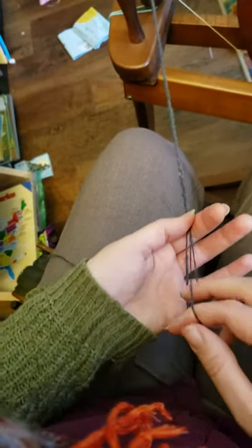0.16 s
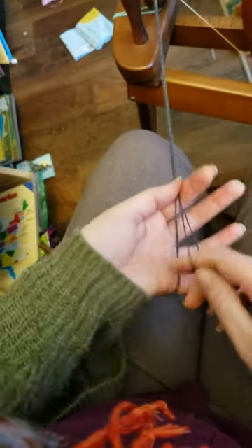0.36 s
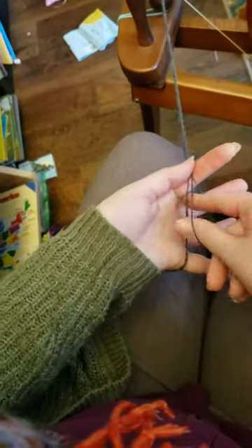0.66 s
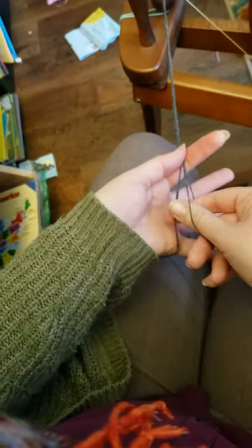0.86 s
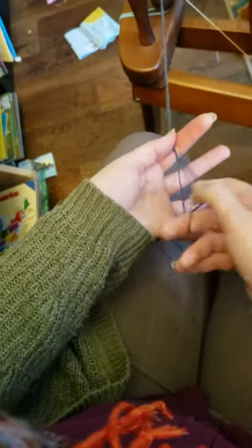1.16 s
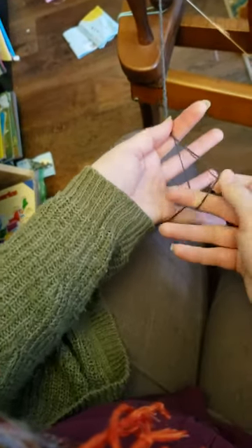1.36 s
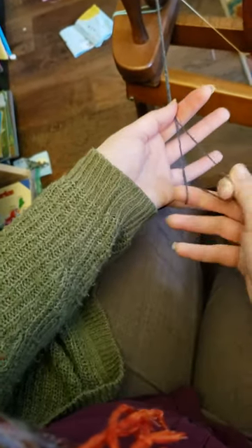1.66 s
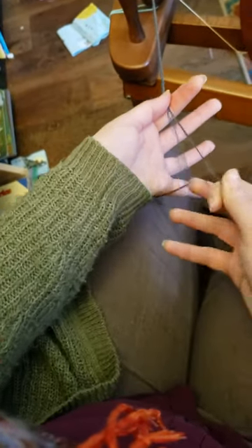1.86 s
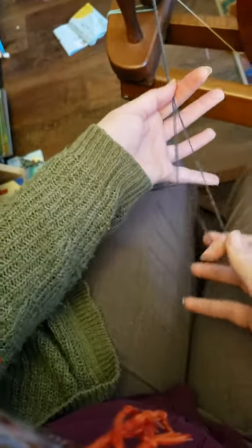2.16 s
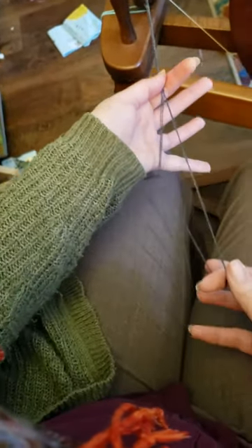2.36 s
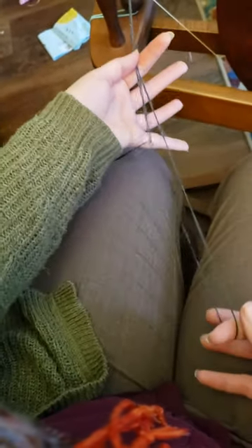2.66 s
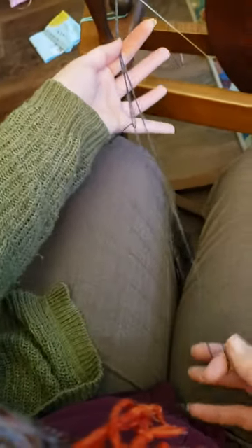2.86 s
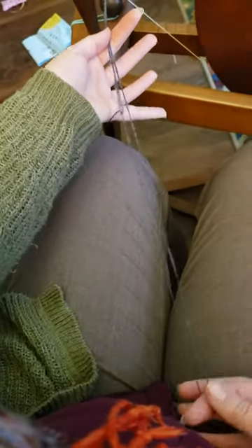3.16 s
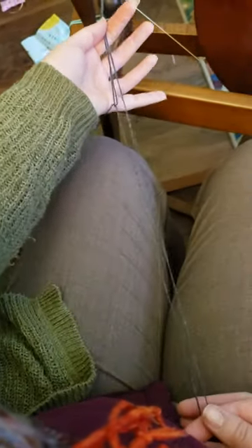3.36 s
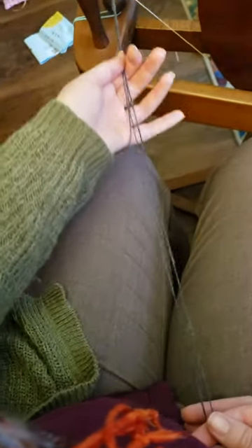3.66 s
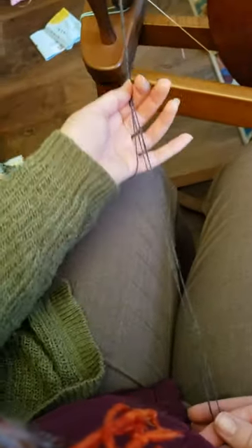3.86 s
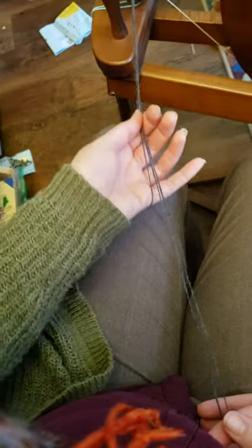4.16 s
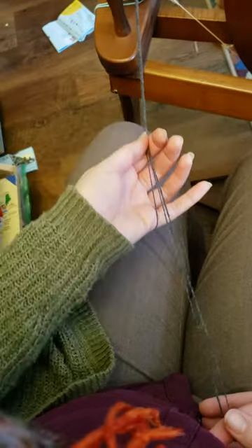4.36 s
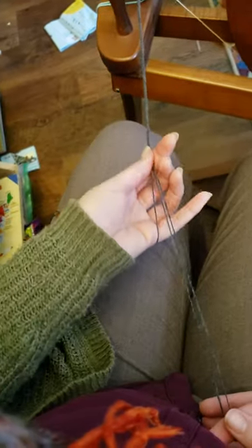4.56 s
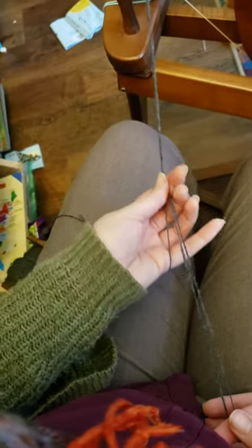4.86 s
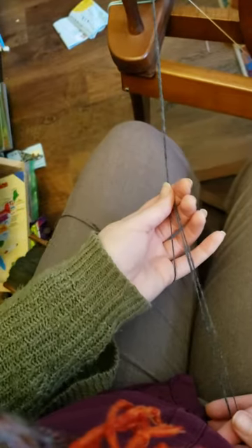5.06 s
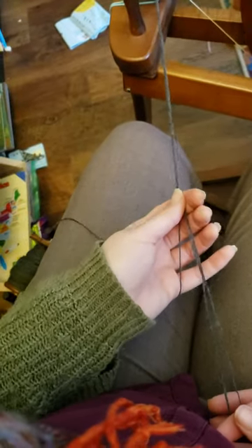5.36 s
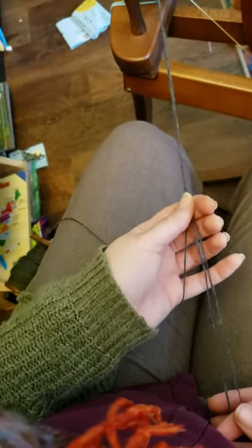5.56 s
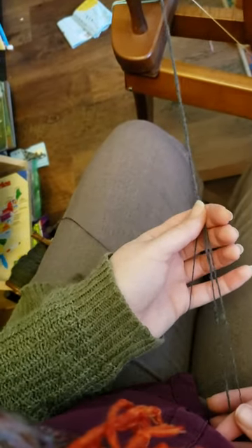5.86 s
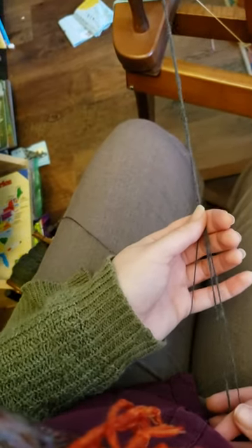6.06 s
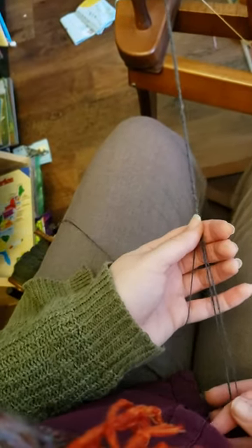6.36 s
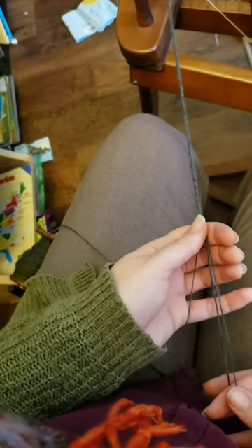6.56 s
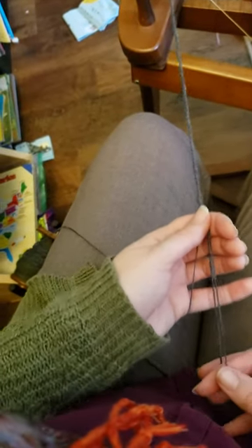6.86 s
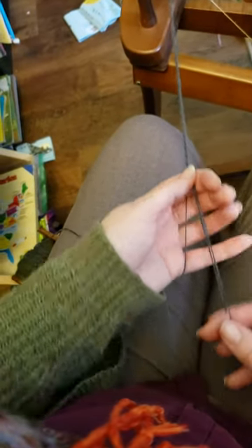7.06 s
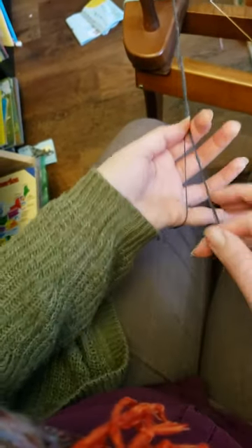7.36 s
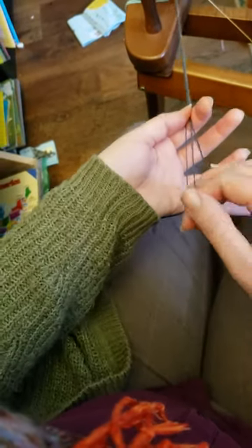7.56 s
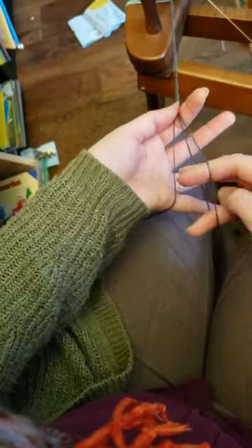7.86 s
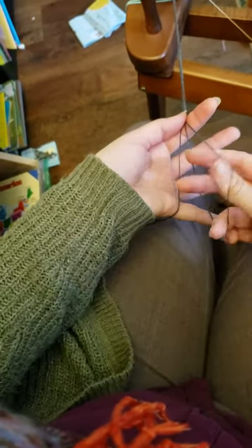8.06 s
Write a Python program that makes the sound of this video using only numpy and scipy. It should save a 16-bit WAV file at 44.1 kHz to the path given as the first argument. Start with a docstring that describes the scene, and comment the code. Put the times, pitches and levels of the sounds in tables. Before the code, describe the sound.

A wooden spinning wheel is treadled indoors, knocking softly about every second and a half, with faint clicks over a low hum.

```python
"""Treadled spinning wheel

A wooden wheel turns in a small room. Once a turn the treadle link takes up its slack with a soft knock;
about half a turn later it falls back, mostly with a double bump. Both ring the frame's modes.
The flyer hums and rumbles through the frame, the drive band rubs, yarn slides, the dry spindle squeaks
and the bobbin clicks, over low room noise and a faint hiss."""
import sys
import numpy as np
from scipy.fft import rfft, irfft, next_fast_len
from scipy.io import wavfile
from scipy.ndimage import map_coordinates

SR = 44100
rng = np.random.default_rng(int(sys.argv[2]) if len(sys.argv) > 2 else 0)


def int16_out(signal):
    """Quantize to a 16-bit WAV file."""
    q = np.round(np.clip(np.atleast_2d(signal).T, -1, 1) * 32767)
    wavfile.write(sys.argv[1], SR, q.astype(np.int16))


N = 362708
TIME_S = np.arange(N) / SR
BLOW_TIME_S = np.arange(SR // 2) / SR


def amp(db):
    """Decibels to gain."""
    return 10 ** (np.asarray(db) / 20)


def pan(left_db, right_db):
    """A gain for each channel."""
    return amp([[left_db], [right_db]])


def unit(x):
    """Scale to rms 1."""
    return x / np.sqrt(np.mean(x ** 2) + 1e-30)


def along(points, hz):
    """Interpolate (Hz, value) points on a log axis."""
    point_hz, values = np.transpose(points)
    return np.interp(np.log(hz + 1), np.log(point_hz), values)


def curves(rows):
    """One value per sample for each column after the time."""
    times_s, *columns = np.transpose(rows)
    return [np.interp(TIME_S, times_s, column) for column in columns]


def wobble(knots_per_s):
    """A smooth random curve, rms near 1."""
    knots = rng.standard_normal(int(N * knots_per_s / SR) + 4)
    return map_coordinates(knots, [TIME_S * knots_per_s])


# Each row: frequency in Hz, left-right correlation.
CORRELATION = [(30, 1), (100, 0.94), (280, 0.95), (500, 1), (900, 0.38), (2000, 0.023)]

def noise(spectrum, size=N, tilt_db_per_oct=0):
    """Stereo noise of rms 1, alike in the bass and unrelated in the treble."""
    n_fft = next_fast_len(size)
    hz = np.fft.rfftfreq(n_fft, 1 / SR)
    spread = np.arccos(np.clip(along(CORRELATION, hz), -1, 1)) / 2
    colour = amp(along(spectrum, hz) + tilt_db_per_oct * np.log2(np.maximum(hz, 400) / 1000))
    white = rfft(rng.standard_normal((2, n_fft)))
    mid, side = irfft(white * colour * [np.cos(spread), np.sin(spread)], n_fft)[:, :size]
    return unit(np.array([mid + side, mid - side]))


def resonance(hz, half_width_hz):
    """Narrow stereo noise of rms 1, whose centre may glide."""
    shape = 1 / (1 + (np.fft.fftfreq(N, 1 / SR) / half_width_hz) ** 2)
    white = rng.standard_normal((2, N)) + 1j * rng.standard_normal((2, N))
    baseband = np.fft.ifft(np.fft.fft(white) * shape)
    carrier = np.exp(2j * np.pi * np.cumsum(hz * np.ones(N)) / SR)
    return unit((baseband * carrier).real)


def swell(rise_s, t60_s):
    """Half a second of envelope: a smooth rise to 1, then exponential decay."""
    attack = np.sin(np.pi / 2 * np.minimum(BLOW_TIME_S / max(rise_s, 1 / SR), 1))
    return attack * amp(-60 * np.maximum(BLOW_TIME_S - rise_s, 0) / t60_s)


def burst(spectrum, rise_s, t60_s, room_db, room_t60_s, tilt_db_per_oct=0):
    """A short noisy blow and the room's weaker, later tail."""
    direct = noise(spectrum, SR // 2, tilt_db_per_oct) * swell(rise_s, t60_s)
    tail = noise(spectrum, SR // 2, tilt_db_per_oct) * swell(rise_s + 0.022, room_t60_s)
    return direct + amp(room_db) * tail


def add(track, start_s, sound):
    """Mix a sound in at a time."""
    start = max(round(start_s * SR), 0)
    part = track[:, start:start + sound.shape[-1]]
    part += sound[..., :part.shape[-1]]


def strokes(rows):
    """A gain that swells and fades once for each row."""
    gain = np.zeros((1, N))
    for start_s, length_s, db in rows:
        add(gain, start_s, amp(db) * np.sin(np.linspace(0, np.pi, round(length_s * SR))))
    return gain


# Each row: frequency in Hz, relative level in dB.
ROOM_SPECTRUM = [(20, -26.5), (32, -22.5), (48, -3), (62, -1), (100, -7.5), (160, -17.5), (300, -36),
                 (600, -40), (1200, -44), (4500, -49.5), (7000, -67)]
HISS_SPECTRUM = [(1000, -2.5), (5000, -10), (6800, -32), (9000, -9), (10700, -1.5), (15500, -3)]
# Each row: frequency in Hz, level in dB.
ROOM_TONES = [(494, -84.5), (597, -88)]

def background():
    """Low room noise, two faint steady tones and the microphone's own hiss."""
    tones = sum(amp(db) * np.sin(2 * np.pi * hz * TIME_S + 0.39 * wobble(4.7)) for hz, db in ROOM_TONES)
    return amp(-58) * noise(ROOM_SPECTRUM) + tones + amp(-79.5) * noise(HISS_SPECTRUM)


# Each row: centre in Hz, width in Hz, relative level in dB.
WHISTLE_BANDS = [(6380, 560, -15), (7037, 150, 0), (7355, 125, 3), (7495, 840, -5.5), (10670, 580, -4.5),
                 (11300, 250, -13.5), (14200, 1100, -17.5)]
# Each row: time in seconds, level in dB.
WHISTLE_LEVEL = [(0, -68), (3.7, -67.5), (4.3, -66.5), (6.9, -66), (7.6, -69)]

def whistle(pulse):
    """Thin bands of hiss on the left: all flutter, and the highest swell most with each pulse."""
    hz = np.fft.rfftfreq(N, 1 / SR)
    level_db, = curves(WHISTLE_LEVEL)
    top_hz = WHISTLE_BANDS[-1][0]
    out = 0
    for centre_hz, width_hz, db in WHISTLE_BANDS:
        shape = amp(db) / (1 + ((hz - centre_hz) / (0.55 * width_hz)) ** 2)
        depth_db = 5 * (centre_hz / top_hz) ** 3
        out += irfft(rfft(rng.standard_normal(N)) * shape, N) * amp(depth_db * pulse)
    return amp(level_db + 0.9 * wobble(36)) * unit(out) * pan(0, -33)


def wheel_turns():
    """Turns at each sample: one from knock to knock, the pace continued at both ends."""
    knocks_s = [knock[0] for knock in KNOCKS]
    marks_s = [2 * knocks_s[0] - knocks_s[1], *knocks_s, 2 * knocks_s[-1] - knocks_s[-2]]
    return np.interp(TIME_S, marks_s, np.arange(len(marks_s)))


# Each row: time in seconds, level in dB.
HUM_LEVEL = [(0, -58), (1.7, -63.5), (2.9, -59.5), (3.9, -54), (4.4, -63.5), (5.3, -57), (5.9, -56.5),
             (7.1, -54), (8.2, -51.5)]
# Each row: time in seconds, pitch in Hz.
HUM_PITCH = [(0, 71.4), (2.7, 73.47), (4, 70.88), (6.3, 72.5), (8.2, 69.9)]
# The frame judders, mostly as yarn is drawn. Each row: start in seconds, length in seconds, level in dB.
JUDDERS = [(.12, 0.41, -55.5), (1.06, 0.11, -51), (1.28, 0.3, -56), (2.57, 0.2, -44.5), (2.74, 0.38, -44.5),
           (3.19, 0.3, -57.5), (3.48, 0.13, -54)]
# Each row: frequency in Hz, relative level in dB.
RUMBLE_SPECTRUM = [(90, -6.5), (160, -9), (240, 4.5), (330, -5.5), (400, -10.5), (500, -11.5), (700, -27.5),
                   (1200, -39), (2500, -68)]

def flyer():
    """The flyer hums, swelling with each push of the foot; the shaking frame adds octave and rumble."""
    push_db, push_lag_turns, tremble_db = 2.5, 0.33, -63.5
    hum_db, = curves(HUM_LEVEL)
    hum_db += push_db * np.cos(2 * np.pi * (wheel_turns() - push_lag_turns))
    shudders = strokes([(start_s, length_s, db) for start_s, *_, db, length_s in KNOCKS])
    shake = amp(tremble_db) + shudders + strokes(JUDDERS)
    hz, = curves(HUM_PITCH)
    phase = 2 * np.pi * np.cumsum(hz) / SR
    hum = unit(np.sin(phase + 0.5 * wobble(16)) * amp(1.86 * wobble(22)))
    octave = unit(np.sin(2 * phase + 1.47 * wobble(28)) * amp(3.2 * wobble(35)))
    rumble = noise(RUMBLE_SPECTRUM) * amp(1.88 * wobble(25))
    return amp(hum_db) * hum + shake * (amp(-4) * octave + amp(-11.5) * rumble)


# Each row: time in seconds, rush in dB, resonance in dB, its centre in Hz.
YARN_DRAW = [(0, -68, -74.5, 1775), (.6, -67.5, -78.5, 1933), (1.0, -66, -81, 2022),
             (1.45, -72.5, -83.5, 2226), (2.05, -66.5, -82, 2020), (2.8, -68.5, -100, 1766),
             (3.15, -80, -105, 1790), (8.2, -115, -120, 1740)]
# Each row: frequency in Hz, relative level in dB.
YARN_SPECTRUM = [(300, 7.5), (600, -6.5), (800, -4), (1080, -3.5), (1450, -12.5), (2100, -11), (2800, -44),
                 (5000, -35)]

def yarn():
    """Yarn slides as the hand draws back: a soft rush with one gliding resonance."""
    rush_db, glide_db, hz = curves(YARN_DRAW)
    rush = amp(rush_db) * noise(YARN_SPECTRUM)
    return rush + amp(glide_db) * resonance(hz, half_width_hz=165) * pan(1, -1)


# Each row: start in seconds, length in seconds, level in dB.
SQUEAKS = [(1.2, 0.11, -83), (1.38, 0.18, -82), (4.03, 0.17, -77), (4.25, .12, -78.5), (4.38, 0.16, -78),
           (4.54, 0.12, -80.5), (5.34, 0.13, -79), (6.76, 0.21, -82), (7.78, 0.51, -92.5)]
# Each row: frequency in Hz, relative level in dB.
SQUEAK_SPECTRUM = [(2000, -15), (2500, -21), (2800, -3.5), (3100, -11), (3420, 2.5), (3650, -7),
                   (5000, -14)]
WHISPER_SPECTRUM = [(1200, -43), (1550, -10.5), (1850, -17), (2200, -3), (2400, -5), (2570, -0.5),
                    (2820, 0), (3130, -12), (3460, -1), (3900, -7.5), (4400, -6.5), (5500, -10.5)]

def spindle(pulse):
    """The dry spindle whispers in its bearing, rubs with each pulse and at times squeaks hoarsely."""
    friction = strokes(SQUEAKS) + amp(-84.5) * np.maximum(pulse, 0)
    squeak = resonance(hz=2568, half_width_hz=32) + amp(-0.5) * noise(SQUEAK_SPECTRUM)
    whisper = noise(WHISPER_SPECTRUM) * amp(-79 + 1.66 * wobble(18))
    return friction * squeak * pan(2, -9) + whisper * pan(2.5, -4)


# Each row: frequency in Hz, level in dB, natural rise in seconds, t60 in seconds.
FRAME_MODES = [(60.7, -11.5, 0.017, 0.18), (133.2, -3, 0.026, 0.085), (195.4, -11.5, 0.0039, 0.17),
               (237.7, -17, 0.028, 0.26), (293.05, -11, 0.0094, 0.043), (345.9, -13.5, 0.033, 0.11),
               (354.9, -18, 0.02, 0.31), (468, -22.5, 0.012, 0.064), (490.3, -24, 0.0082, 0.18),
               (648, -38, 0.031, 0.23), (717, -33, 0.02, 0.18), (877, -35, 0.0063, 0.26),
               (1130, -39, .006, 0.14), (1167, -33.5, 0.012, 0.21), (1253, -34, .004, 0.18),
               (1390, -34, 0.0015, 0.15), (1530, -25.5, 0.001, 0.13)]
BASS_HZ = 260  # modes below this carry the treadle's weight

def frame(drive_db, scatter_db, rise_s=None):
    """One blow rings the frame's modes, each weighted by drive_db(hz); the low ones set in last."""
    lag_cycles = 0.42
    out = np.zeros((1, SR // 2))
    for hz, db, natural_rise_s, t60_s in FRAME_MODES:
        gain = amp(db + drive_db(hz) + rng.normal(0, scatter_db))
        envelope = swell(rise_s or natural_rise_s, t60_s)
        add(out, lag_cycles / hz, -gain * envelope * np.cos(2 * np.pi * hz * BLOW_TIME_S))
    return out


# Each row: start in seconds, ring in dB, bass weight in dB, rise in seconds, rattle in dB.
BUMPS = [(0, -45, -0.5, 0.0017, -50), (0.495, -52.5, -2, 0.011, -57.5), (1.374, -62, -2, 0.016, -61.5),
         (1.440, -46.5, -1.5, 0.035, -52.5), (2.885, -51.5, -8, 0.037, -53.5),
         (4.178, -46.5, -2, 0.002, -49), (4.257, -47, 4.5, 0.029, -50), (5.459, -52, -10, 0.0052, -56),
         (5.527, -47, 0.5, 0.033, -53.5), (6.699, -55.5, -9, 0.013, -58), (6.756, -48, 0.5, 0.029, -53.5),
         (7.064, -48.5, -1.5, 0.016, -54), (8.018, -60.5, 10.5, 0.015, -66), (8.079, -49.5, 5, 0.03, -57.5)]
# Each row: frequency in Hz, relative level in dB.
LINK_DRIVE = [(60, 14.5), (131, 0.5), (182, 2), (232, 2), (288, 16.5), (335, -16), (358, -14), (490, 3),
              (700, 1.5), (1500, -23)]
RATTLE_SPECTRUM = [(100, -35), (200, 9.5), (290, 19), (480, 2.5), (600, -2), (800, -8), (1150, -17.5),
                   (1700, -16), (2100, -23), (5000, -27)]

def link():
    """The slack link falls back, ringing the frame under a woody rattle, often twice in quick turn."""
    out = np.zeros((2, N))
    for start_s, ring_db, bass_db, rise_s, rattle_db in BUMPS:
        drive_db = lambda hz: along(LINK_DRIVE, hz) + bass_db * (hz < BASS_HZ)
        ring = frame(drive_db, scatter_db=0.5, rise_s=rise_s)
        rattle = burst(RATTLE_SPECTRUM, rise_s / 2, t60_s=0.23, room_db=-12.5, room_t60_s=0.5)
        add(out, start_s, amp(ring_db) * ring + amp(rattle_db) * rattle)
    return out


def ping(hz, t60_s):
    """One struck mode, with a random phase in each channel."""
    return np.sin(2 * np.pi * (hz * BLOW_TIME_S + rng.random((2, 1)))) * swell(0.0019, t60_s)


# Each row: start in seconds, level in dB, tilt in dB per octave, t60 in seconds,
# bobbin ring in dB, centre of that ring in Hz.
CLICKS = [(0.137, -65, -3.5, 0.3, -82, 700), (.300, -59, -1.5, 0.24, -66, 1700),
          (1.817, -64.5, -2.5, 0.27, -72, 894), (2.763, -57.5, 0, 0.48, -68, 2500),
          (2.936, -55, 2, 0.19, -69, 2210), (7.010, -60, 0, 0.26, -62.5, 1900),
          (7.067, -69, 2, 0.3, -64, 900), (7.087, -70, 3, 0.45, -68.5, 2700),
          (7.203, -69.5, -0.5, 0.72, -75, 900), (7.281, -59.5, -4, .32, -62, 1190)]
# Each row: frequency in Hz, relative level in dB.
CLICK_SPECTRUM = [(200, -31), (450, 7.5), (750, 6), (1050, 0), (1400, -3), (1680, -2.5), (1900, -7.5),
                  (2350, -8), (2820, 1), (3150, -11), (3550, -2.5), (3950, -15), (7000, -17.5),
                  (15000, -47)]
# Each row: start in seconds, level in dB.
HOOK_TICKS = [(2.763, -51), (2.936, -49), (7.01, -60.5)]
# Each row: frequency in Hz, relative level in dB, t60 in seconds.
BOBBIN_MODES = [(570, -4, .23), (685, 0, 0.27), (965, -2.5, 0.34), (1133, -1, 0.18), (1670, -12.5, 0.35),
                (2150, -14.5, 0.51), (2750, -9, 0.3), (2820, -10, 0.62), (3440, -6.5, 0.29),
                (3460, -12, 0.13)]
HOOK_MODES = [(3660, 0, 0.013), (3450, -4.5, 0.02), (7350, -10.5, .023)]

def bobbin():
    """Hard little contacts ring the bobbin, the sharpest also a wire hook; the room answers."""
    out = np.zeros((2, N))
    for start_s, db, tilt, t60_s, ring_db, centre_hz in CLICKS:
        ring = 0
        for hz, mode_db, mode_t60_s in BOBBIN_MODES:
            off_centre_db = -3 * np.log2(hz / centre_hz) ** 2
            ring += amp(mode_db + rng.normal(0, 1.2) + off_centre_db) * ping(hz, mode_t60_s)
        click = burst(CLICK_SPECTRUM, 0.00056, t60_s, room_db=-9, room_t60_s=0.36, tilt_db_per_oct=tilt)
        add(out, start_s, amp(db) * click + amp(ring_db) * ring)
    for start_s, db in HOOK_TICKS:
        tick = sum(amp(mode_db) * ping(hz, t60_s) for hz, mode_db, t60_s in HOOK_MODES)
        add(out, start_s, amp(db) * tick)
    return out * pan(1.5, -1.5)


# Each row: start in seconds, level in dB.
THUDS = [(.3, -52), (0.509, -40.5), (1.093, -55), (2.85, -41), (2.996, -45), (3.194, -43.5), (7.225, -45),
         (7.283, -42.5)]
# Each row: frequency in Hz, relative level in dB.
THUD_DRIVE = [(60, 7.5), (133, -0.5), (235, 0.5), (340, -11), (500, -8), (1000, -24)]

def thuds():
    """The frame rocks on its legs: soft blows that ring mainly its low modes."""
    out = np.zeros((2, N))
    for start_s, db in THUDS:
        add(out, start_s, amp(db) * frame(lambda hz: along(THUD_DRIVE, hz), scatter_db=3))
    return out


# Each row: start in seconds, ring in dB, weight above the bass in dB, clack in dB,
# shudder in dB, shudder length in seconds.
KNOCKS = [(0.716, -29, -0.5, -49.5, -52.5, 0.37), (2.212, -28.5, -1.5, -51.5, -44, 0.33),
          (3.622, -27.5, -1.5, -50, -47.5, 0.4), (4.9406, -29.5, -2, -54.5, -59, 0.13),
          (6.185, -28.5, -1, -52.5, -50, 0.25), (7.4225, -29, -0.5, -50.5, -48.5, 0.15)]
# Each row: frequency in Hz, relative level in dB.
CLACK_SPECTRUM = [(150, -4.5), (300, 12.5), (500, 0.5), (650, -3), (950, -9), (1200, -8), (1650, -11),
                  (1950, -20.5), (3000, -34.5), (12000, -48)]
REBOUND_SPECTRUM = [(600, -20), (1150, 11), (1600, -3), (1900, -17), (4000, -28)]

def treadle():
    """A knock each turn rings the frame under a wooden clack; the last one rebounds."""
    rebound_s, rebound_db = 7.51, -60.5
    out = np.zeros((2, N))
    for start_s, ring_db, upper_db, clack_db, *_ in KNOCKS:
        ring = frame(lambda hz: upper_db * (hz > BASS_HZ), scatter_db=1.4)
        clack = burst(CLACK_SPECTRUM, rise_s=0.0015, t60_s=0.28, room_db=-1.5, room_t60_s=0.25)
        add(out, start_s, amp(ring_db) * ring + amp(clack_db) * clack)
    rebound = burst(REBOUND_SPECTRUM, rise_s=0.003, t60_s=0.054, room_db=-24, room_t60_s=0.16)
    add(out, rebound_s, amp(rebound_db) * rebound)
    return out


# Each row: start in seconds, length in seconds, level in dB.
RUBS = [(.835, 0.17, -57), (2.28, 0.11, -68.5), (3.76, 0.11, -68.5), (3.84, 0.12, -64.5), (6.27, 0.12, -74),
        (7.464, 0.077, -69)]
# Each row: frequency in Hz, relative level in dB.
RUB_SPECTRUM = [(250, -20), (430, -18), (600, -6), (700, -21), (850, -30), (1140, -35), (1600, -69)]

def drive_band():
    """The band slips on the whorl in short, rough rubs after most knocks."""
    roughness = unit(amp(2 * wobble(73)))
    return strokes(RUBS) * noise(RUB_SPECTRUM) * roughness


# Each row: start in seconds, level in dB, rise in seconds, t60 in seconds.
FLICKS = [(0.86, -58, 0.011, 0.04), (1.628, -69, 0.012, 0.12), (3.619, -72, 0.036, 0.35),
          (4.539, -70, .04, 0.18)]
# Each row: frequency in Hz, relative level in dB.
FLICK_SPECTRUM = [(3000, -36), (5000, -8), (7000, 5.5), (9500, -6), (13000, 4.5), (15500, 1)]

def fingers():
    """Fibres flick and brush over the fingers, close by on the left."""
    out = np.zeros((2, N))
    for start_s, db, rise_s, t60_s in FLICKS:
        add(out, start_s, amp(db) * burst(FLICK_SPECTRUM, rise_s, t60_s, room_db=-12, room_t60_s=0.18))
    return out * pan(1.5, -2.5)


def scene():
    """The wheel and its room; spindle friction and whistle share one uneven pulse."""
    pulse_hz = 5
    pulse = np.sin(2 * np.pi * pulse_hz * TIME_S + 1.66 * wobble(5))
    contacts = treadle() + link() + thuds() + bobbin() + fingers()
    return contacts + flyer() + drive_band() + yarn() + spindle(pulse) + whistle(pulse) + background()


def record(dry):
    """The right microphone port hears later, with more low mids and less upper mids; both are low-passed."""
    lag_s, top_hz = 0.00024, 15720
    n_fft = next_fast_len(N + SR // 2)
    hz = np.fft.rfftfreq(n_fft, 1 / SR)
    lean_db = along([(330, 0), (600, 3.5), (850, 3), (1200, -3.5), (2000, -2), (4000, 0)], hz)
    balance = amp([-lean_db / 2, lean_db / 2])
    lag = np.exp(1j * np.pi * hz * lag_s * np.array([[1], [-1]]))
    return irfft(rfft(dry, n_fft) * lag * balance * (hz < top_hz), n_fft)[:, :N]


dry = scene()
out = record(dry)
int16_out(out)
```